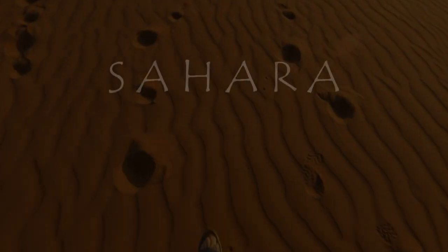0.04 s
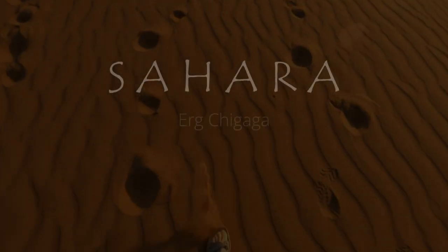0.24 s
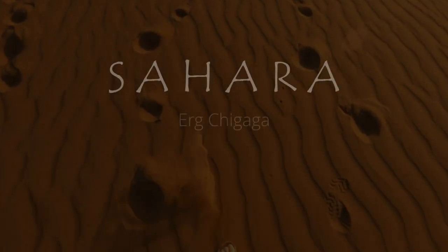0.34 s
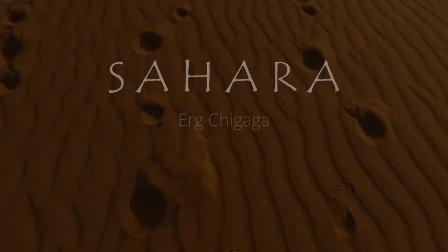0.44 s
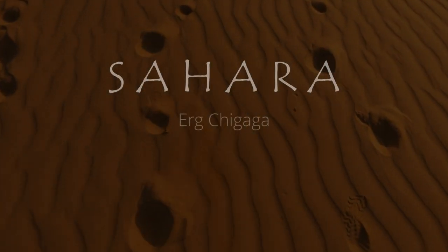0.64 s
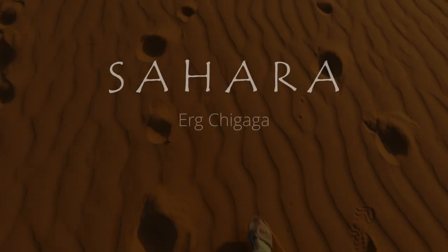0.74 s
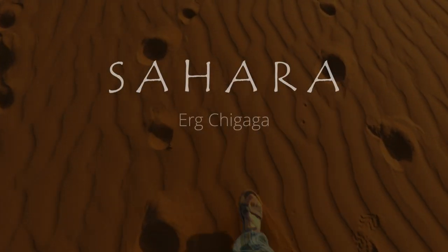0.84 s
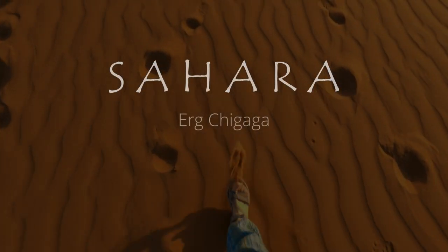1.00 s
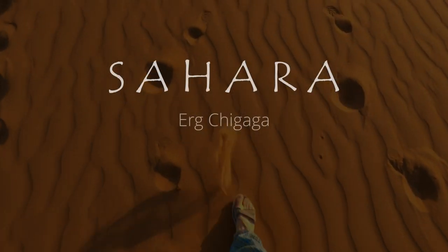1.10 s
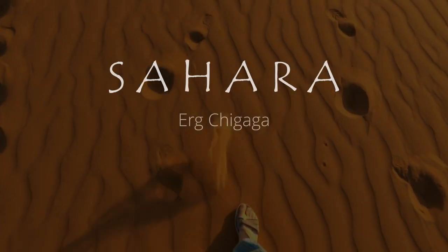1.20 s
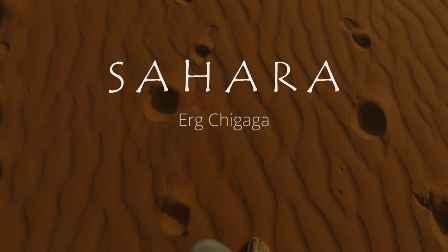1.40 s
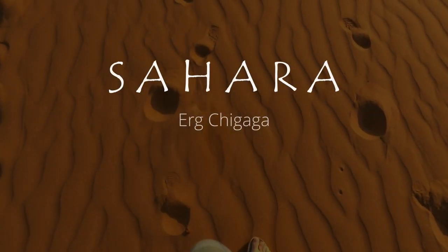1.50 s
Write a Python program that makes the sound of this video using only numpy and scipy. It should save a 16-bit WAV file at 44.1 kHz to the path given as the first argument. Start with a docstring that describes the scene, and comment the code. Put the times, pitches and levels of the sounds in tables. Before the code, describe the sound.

Footsteps in sandals swish and crunch through dry sand, close by and without echo. Loose grains slide from the start, with small sandal ticks from 0.5 seconds and a soft, crunching thud at about 0.75. At 1.2 seconds a sandal slaps the heel, the loudest moment, followed by a faint squeak near 1.4. Light wind rumbles on the microphone in small gusts throughout.

```python
"""Dry sand crunches and swishes as someone walks over a dune in sandals, microphone in hand.
Each stride shears and throws loose grains; the sole lands with a soft thud and crunches as the sand packs.
The sandal ticks, slaps once against the heel, loudest of all, and then faintly squeaks.
A light wind nudges the two microphone ports; the open desert gives no echo."""
import sys
import numpy as np
from scipy import signal
from scipy.fft import rfft, irfft
from scipy.io import wavfile
from scipy.ndimage import uniform_filter1d, map_coordinates

SR = 44100
rng = np.random.default_rng(int(sys.argv[2]) if len(sys.argv) > 2 else 0)


def log_audio(samples):
    """Write samples as a 16-bit WAV file to the path given in sys.argv[1]."""
    # one column per channel
    frames = np.atleast_2d(samples).T
    # limit to full scale, then quantise
    limited = np.clip(frames, -1, 1)
    pcm = np.round(limited * 32767).astype(np.int16)
    wavfile.write(sys.argv[1], SR, pcm)


N = 68355
TIME = np.arange(N) / SR
BIN_HZ = np.arange(N // 2 + 1) * SR / N
IMPACT_PAN_DB = .7


def amp(db):
    """Amplitude grows tenfold for every 20 dB."""
    return 10 ** (np.asarray(db) / 20)


def envelope(points):
    """A gain interpolated in decibels between (s, dB) points."""
    return amp(np.interp(TIME, *np.array(points).T))


def colour(x, spectrum):
    """Spectral shaping: x is filtered through (Hz, dB) points, rolled off outside them, at rms 1."""
    hz, db = np.array(spectrum).T
    f = np.maximum(BIN_HZ, 1)
    gain = amp(np.interp(np.log(f), np.log(hz), db))
    low_cut = np.minimum(f / hz[0], 1)
    high_cut = 1 / (1 + (f / (hz[-1] * 1.1)) ** 16)
    shaped = irfft(rfft(x) * gain * low_cut * high_cut, N)
    return shaped / np.std(shaped)


def wander(per_s):
    """Smooth random modulation with a spread near 1."""
    knots = rng.standard_normal(N // 10)
    return map_coordinates(knots, [TIME * per_s], order=2, mode="wrap")


def swell(start, rise_s):
    """A soft contact builds to 1 in rise_s and dies almost as fast."""
    age_in_rises = np.maximum(TIME - start, 0) / rise_s
    return (age_in_rises * np.exp(1 - age_in_rises)) ** 3.5


def ring(start, hz, rise_s):
    """A heavily damped resonance lasts a few cycles at most."""
    return swell(start, rise_s) * np.sin(2 * np.pi * hz * (TIME - start))


def fade(start, decay_s):
    """Exponential decay follows an instant attack."""
    age = TIME - start
    return (age >= 0) * np.exp(-np.abs(age) / decay_s)


def pan(db):
    """Left and right gains for a level difference, left minus right."""
    return amp(np.array([[db], [-db]]) / 2)


def ports(x, pan_db, lag_s=.000045):
    """Time and level differences: the left port hears x later, and louder by pan_db."""
    late = irfft(rfft(x) * np.exp(-2j * np.pi * BIN_HZ * lag_s), N)
    return np.array([late, x]) * pan(pan_db)


def grains(per_s=9000, scatter_db=3):
    """Shot noise: sand grains collide at random, a few much harder than the rest."""
    hits = rng.random(N) < per_s / SR
    polarity = np.sign(rng.standard_normal(N))
    strength = amp(scatter_db * np.minimum(rng.exponential(size=N), 5))
    return hits * polarity * strength


def sand(spectrum, slip_db=1.3):
    """Grains slip in fits; coherence between the ports falls with frequency."""
    shared = ports(colour(grains(), spectrum), pan_db=0)
    separate = np.array([colour(grains(), spectrum) for _ in range(2)])
    spread = np.clip(.42 * (.5 + BIN_HZ / 4000), 0, 1)
    blend = irfft(rfft(shared) * np.sqrt(1 - spread ** 2) + rfft(separate) * spread, N)
    return blend * pan(db=1.5) * amp(slip_db * wander(per_s=130))


# Wind pressure on the ports. Each row: time in seconds, level in dB.
GUST_LEVELS = [(0, -68), (.11, -52), (.2, -61), (.35, -56.5), (.48, -41.5), (.58, -49.5), (.68, -42.5),
               (.8, -52.5), (.9, -53), (.965, -47.5), (1.03, -53), (1.085, -40.5), (1.112, -46),
               (1.15, -42), (1.23, -44.5), (1.28, -50), (1.36, -42.5), (1.42, -54.5), (1.55, -61)]
# Spectra of the gusts and the moving air. Each row: frequency in Hz, relative level in dB.
GUST_SPECTRUM = [(10, 7), (22, 4.5), (40, -7), (60, -5.5), (100, -14.5), (200, -52), (500, -30),
                 (2000, -83)]
AIR_SPECTRUM = [(40, -16.5), (100, -0.5), (240, -6.5), (330, -14), (480, -21.5), (720, -13), (1000, -17.5),
                (2000, -38), (4500, -24), (7500, -43), (10500, -57.5), (15000, -59)]


def wind():
    """Turbulent pressure rumbles on each port independently, over a partly coherent wash of air."""
    rumble = colour(rng.standard_normal((2, N)), GUST_SPECTRUM) * envelope(GUST_LEVELS) * pan(db=6.5)
    shared_air = ports(colour(rng.standard_normal(N), AIR_SPECTRUM), pan_db=0)
    separate_air = colour(rng.standard_normal((2, N)), AIR_SPECTRUM)
    air_gain = amp(-64 + 3.2 * wander(per_s=13.62))
    return rumble + (shared_air + separate_air) * air_gain


# Puffs of air. Each row: start in seconds, frequency in Hz, envelope peak in dB, rise in seconds.
AIR_PUFFS = [(0.933, 14, -30.5, 0.032), (1.090, 50.4, -26.5, 0.018), (1.236, 38, -32.5, 0.019)]


def buffets():
    """Pressure swings slowly at the left port as the stride carries the microphone through the air."""
    pressure = sum(amp(db) * ring(start, hz, rise) for start, hz, db, rise in AIR_PUFFS)
    return np.array([pressure, np.zeros(N)])


def squeak(start=1.354, rise_s=.011, start_hz=2428, sag_hz_per_s=11000, roughness=.05):
    """Friction in the sandal excites a faint, rough note of falling pitch."""
    age = np.clip(TIME - start, 0, 3 * rise_s)
    hz = (start_hz - sag_hz_per_s * age) * (1 + roughness * wander(per_s=600))
    tone = np.sin(2 * np.pi * np.cumsum(hz) / SR)
    return ports(amp(-57.5) * swell(start, rise_s) * tone, pan_db=7)


# Ticks of the sandal. Each row: start in seconds, gain in dB, left minus right in dB.
SANDAL_TICKS = [(.500, -45, -2), (0.5776, -36.5, 2), (0.648, -42, 3), (0.748, -33.5, 9.5),
                (.9838, -40.5, 7)]


def ticks(hz=2250, muffle_hz=6370):
    """Brief impacts ring and stir a pinch of grit; their treble is dull, fading above a few kHz."""
    grit = amp(-11) * sand([(700, 26), (2000, 9), (4000, 10), (7000, -15), (10000, -31)])
    snaps = np.zeros((2, N))
    for start, db, pan_db in SANDAL_TICKS:
        snap = ports(ring(start, hz, rise_s=.00027), pan_db)
        wake = fade(start, decay_s=.0018) * grit * pan(pan_db)
        snaps += amp(db) * (snap + wake)
    return signal.sosfilt(signal.butter(4, muffle_hz, fs=SR, output="sos"), snaps)


# Sand sheared by the sole and thrown by the toe. Each row: time in seconds, level in dB.
SHEAR_LEVELS = [(0, -57), (.04, -60.5), (.13, -66.5), (.21, -57.5), (.27, -51.5), (.30, -52.5),
                (.37, -50.5), (.43, -54), (.52, -55), (.60, -58.5), (.65, -55.5), (.695, -62.5),
                (.735, -60.5), (.775, -58), (.81, -57), (.96, -67.5), (1.10, -60.5), (1.127, -49),
                (1.15, -53), (1.19, -58.5), (1.207, -47), (1.25, -51.5), (1.32, -59.5), (1.4, -62.5),
                (1.55, -65.5)]
SPRAY_LEVELS = [(0, -76), (.135, -63), (.175, -57), (.245, -50.5), (.29, -63.5), (.39, -52), (.47, -80),
                (.95, -67.5), (1.0, -60.5), (1.06, -53), (1.095, -62.5), (1.17, -55.5), (1.22, -59),
                (1.29, -66), (1.4, -90), (1.55, -85)]
# Trickles of fine sand. Each row: time of the peak in seconds, half-width in seconds, level in dB.
SAND_TRICKLES = [(.008, 0.015, -60), (0.258, 0.0044, -57), (.40, 0.074, -59.5), (0.43, 0.0095, -60.5),
                 (0.543, .002, -58), (0.579, 0.0012, -51.5), (.654, .003, -65), (.761, 0.0037, -52),
                 (0.873, 0.0044, -61), (1.17, 0.0052, -57), (1.229, 0.017, -64), (1.251, 0.0095, -55.5),
                 (1.445, .02, -67)]
# Spectra of the three flows. Each row: frequency in Hz, relative level in dB.
SHEAR_SPECTRUM = [(100, -19.5), (250, -3), (450, -10), (750, -4.5), (1030, -1.5), (1250, -5), (1900, -2.5),
                  (3000, -9.5), (4600, -15), (5600, -24.5), (7800, -33), (10500, -51)]
SPRAY_SPECTRUM = [(300, -37), (1200, -18), (1700, -3), (2300, -3), (3000, -4.5), (4500, -17.5), (7500, -29),
                  (10500, -52.5)]
TRICKLE_SPECTRUM = [(1500, -43.5), (3000, 1.5), (4400, 1), (5600, -8.5), (7800, -12), (10000, -30.5)]


def swishes():
    """Granular flow: collisions merge into noise as sand shears, sprays and trickles back."""
    shear = sand(SHEAR_SPECTRUM) * envelope(SHEAR_LEVELS)
    spray = sand(SPRAY_SPECTRUM) * envelope(SPRAY_LEVELS)
    pulses = sum(amp(db) * np.exp(-((TIME - peak) / width) ** 2) for peak, width, db in SAND_TRICKLES)
    return shear + spray + sand(TRICKLE_SPECTRUM) * pulses


# Pockets of sand giving way. Each row: start in seconds, frequency in Hz, envelope peak in dB.
COLLAPSES = [(.005, 770, -42), (.021, 840, -40.5), (.261, 770, -45), (.312, 970, -43.5), (.348, 900, -42.5),
             (0.477, 930, -48), (.6205, 1100, -43), (0.623, 610, -40.5), (0.6458, 910, -38),
             (0.71, 830, -43.5), (.747, 765, -29.5), (0.7744, 736, -36), (0.779, 910, -41.5),
             (0.782, 875, -47), (0.797, 1310, -60), (0.8356, 780, -38), (0.8417, 860, -41),
             (.917, 800, -47), (1.001, 804, -44), (1.0338, 840, -42.5), (1.058, 990, -43.5),
             (1.119, 900, -42), (1.124, 1090, -37.5), (1.17, 950, -43.5), (1.290, 1090, -41)]


def crunches():
    """Compaction: each collapsing pocket gives a dull knock and a short wake of grit."""
    knocks = sum(amp(db) * ring(start, hz, rise_s=.0012) for start, hz, db in COLLAPSES)
    wakes = sum(amp(db) * fade(start, decay_s=.009) for start, _, db in COLLAPSES)
    rounded_wakes = uniform_filter1d(wakes, size=40)
    grit = colour(grains(), [(400, -24), (680, 17), (1100, 3), (1600, 0), (3000, -26.5), (9000, -37)])
    return ports(knocks + amp(-15.5) * rounded_wakes * grit, IMPACT_PAN_DB)


# Blows of the feet. Each row: start in seconds, frequency in Hz, envelope peak in dB, rise in seconds.
FOOT_BLOWS = [(.092, 108, -44.5, 0.0093), (.230, 127, -42, 0.0061), (.258, 215, -39.5, 0.0043),
              (.296, 136, -44.5, 0.0094), (.474, 150.5, -41, 0.012), (0.49, 130, -38, 0.0037),
              (0.501, 246, -51, 0.012), (.620, 229, -46, 0.0041), (0.651, 110, -48, 0.013),
              (.746, 208, -23, 0.0056), (0.742, 146, -31.5, 0.0032), (1.12, 97.2, -39, .012),
              (1.1984, 102, -30.5, 0.007), (1.252, 171, -48.5, .005), (1.425, 108, -48, 0.0077),
              (1.501, 215, -48, 0.0046), (1.525, 202, -44.5, 0.0044)]
# Scuffs of the sole. Each row: start in seconds, rise in seconds, level in dB.
SOLE_SCUFFS = [(0.076, 0.025, -58.5), (.225, 0.036, -53), (0.453, 0.036, -45), (.565, 0.079, -52.5),
               (0.751, 0.015, -44), (1.074, 0.026, -48.5), (1.241, .035, -54), (1.42, 0.046, -60)]
# Their muffled spectrum. Each row: frequency in Hz, relative level in dB.
SCUFF_SPECTRUM = [(50, -2.5), (110, -2), (250, -5.5), (380, -11.5), (600, -18), (2000, -63)]


def thuds():
    """Damped impact: the foot's weight thumps the soft ground, and the sole scuffs as it settles."""
    blows = sum(amp(db) * ring(start, hz, rise) for start, hz, db, rise in FOOT_BLOWS)
    settling = sum(amp(db) * swell(start, rise) for start, rise, db in SOLE_SCUFFS)
    scuffs = colour(grains(), SCUFF_SPECTRUM) * settling
    return ports(blows + scuffs, IMPACT_PAN_DB)


# One slap and its two rebounds. Each row: start in seconds, level in dB.
HEEL_CONTACTS = [(1.1974, -14.5), (1.2012, -28.5), (1.2075, -30.5)]
# Resonances of the sole. Each row: frequency in Hz, level relative to the contact in dB, rise in seconds.
SOLE_MODES = [(1048, -0.5, 0.0011), (1994, -18.5, 0.0023), (2410, -23.5, 0.001)]


def slap(grit_db=-28):
    """Impact on the heel excites the sole's modes in a hollow pop and crushes the sand caught between."""
    pop = sum(amp(db + mode_db) * ring(start, hz, rise)
              for start, db in HEEL_CONTACTS for hz, mode_db, rise in SOLE_MODES)
    crush = sum(amp(db + grit_db) * swell(start, rise_s=.0071) for start, db in HEEL_CONTACTS)
    grit = colour(grains(), [(300, 1.5), (800, -3), (1900, 0), (3200, -7), (4500, -30), (9000, -47)])
    return ports(pop + crush * grit, IMPACT_PAN_DB)


def scene():
    """Superposition in a free field: footsteps and wind add without reflections."""
    footsteps = swishes() + thuds() + crunches() + ticks() + slap() + squeak()
    return footsteps + wind() + buffets()


def record(dry):
    """Band limiting: a steep low-pass filter removes the treble above 15.3 kHz."""
    return signal.sosfilt(signal.ellip(8, .2, 70, 15300, fs=SR, output="sos"), dry)


dry = scene()
out = record(dry)
log_audio(out)
```